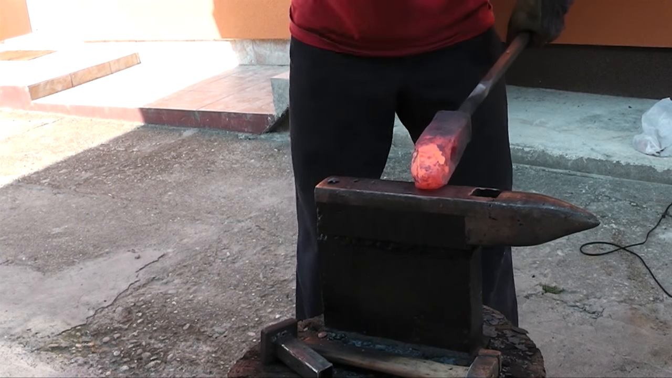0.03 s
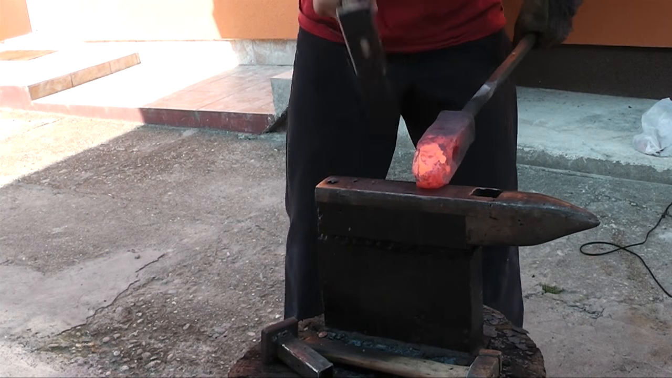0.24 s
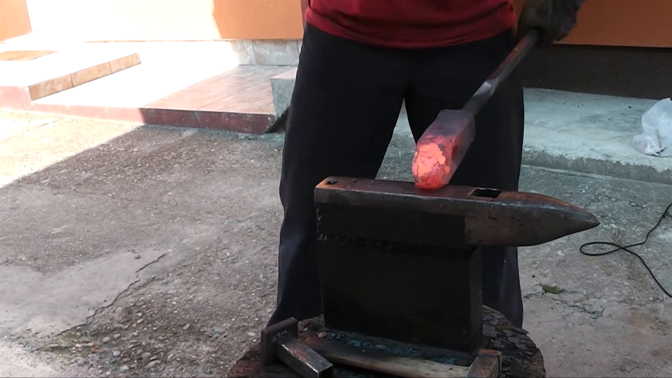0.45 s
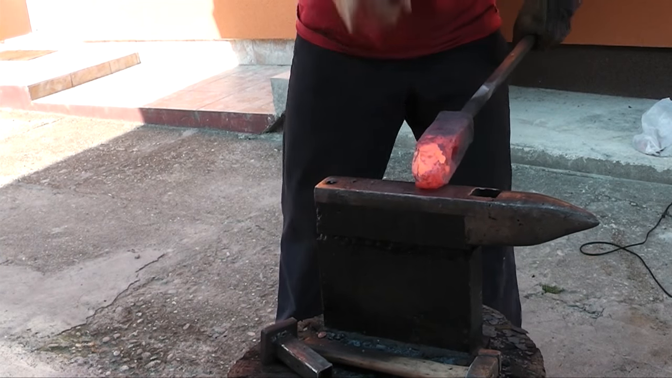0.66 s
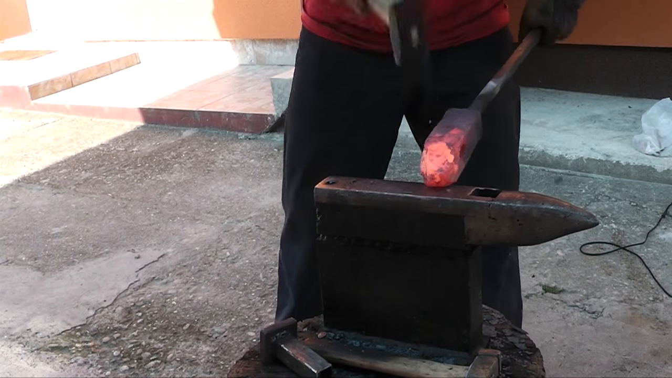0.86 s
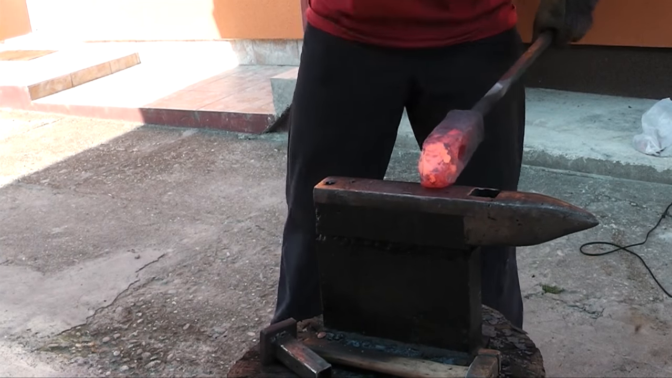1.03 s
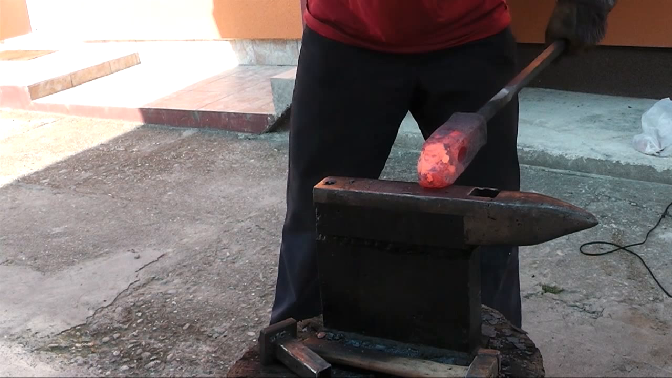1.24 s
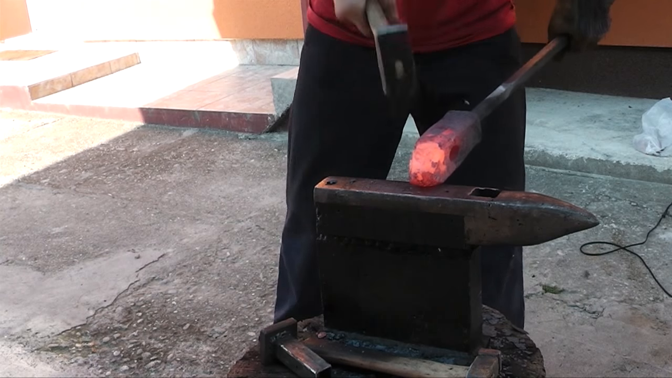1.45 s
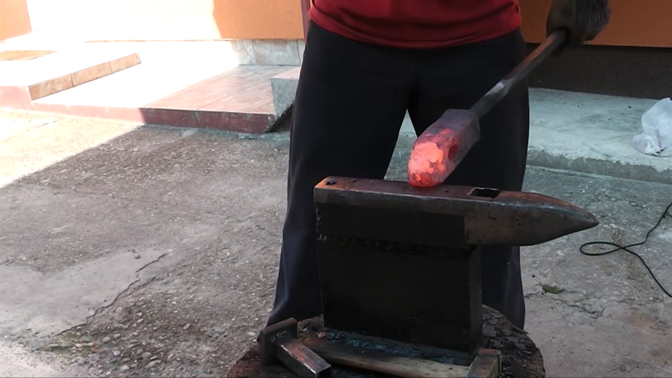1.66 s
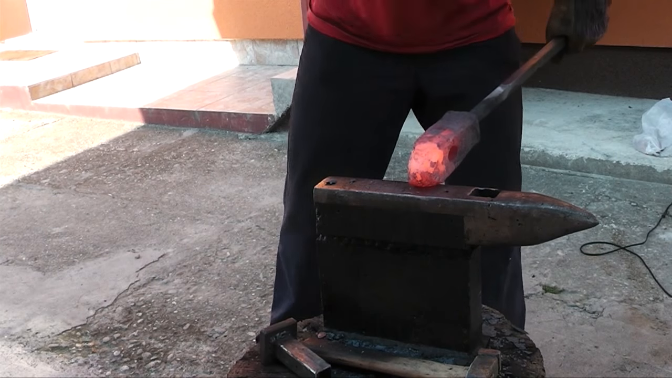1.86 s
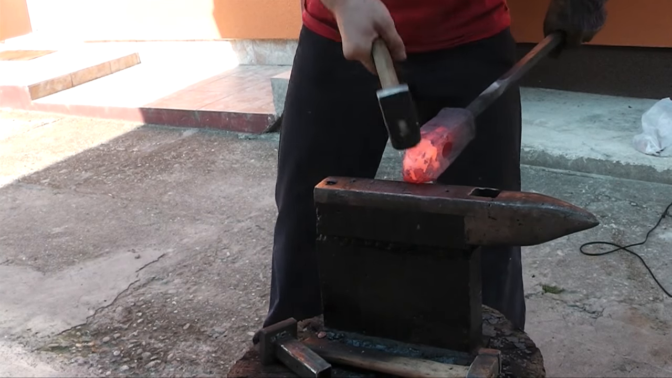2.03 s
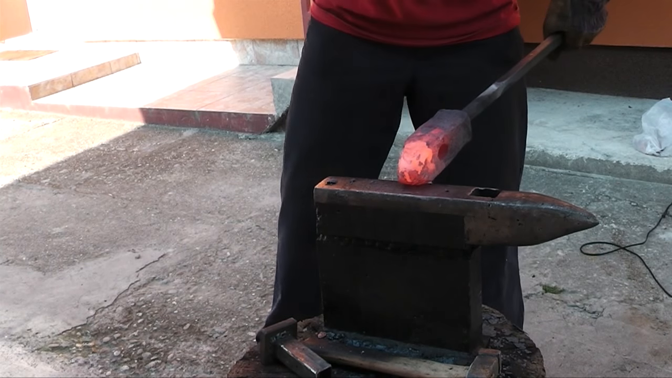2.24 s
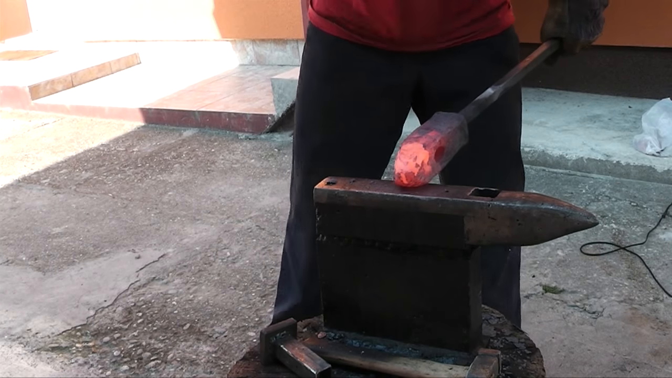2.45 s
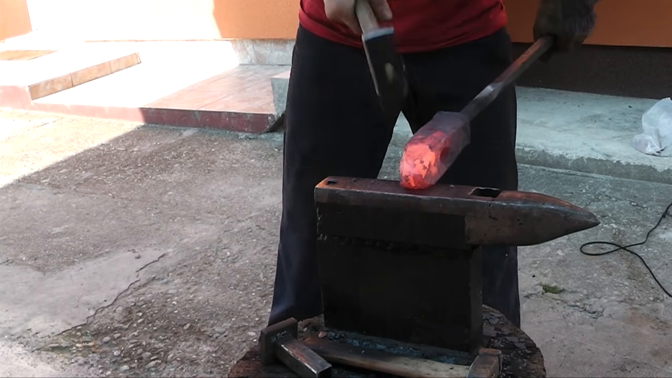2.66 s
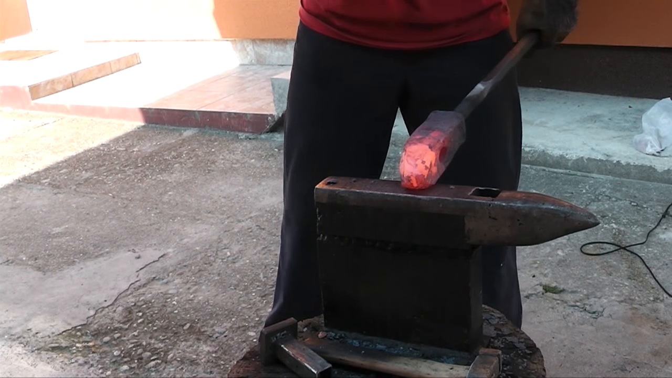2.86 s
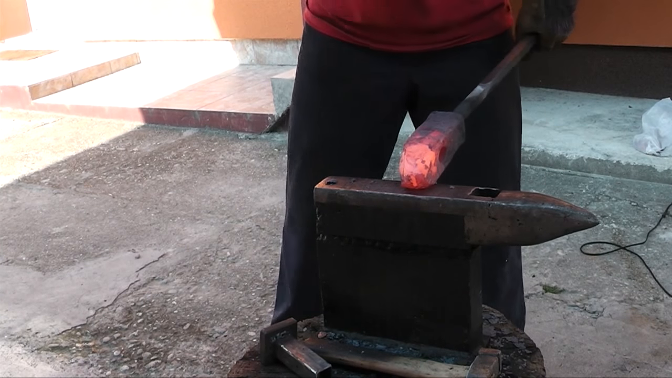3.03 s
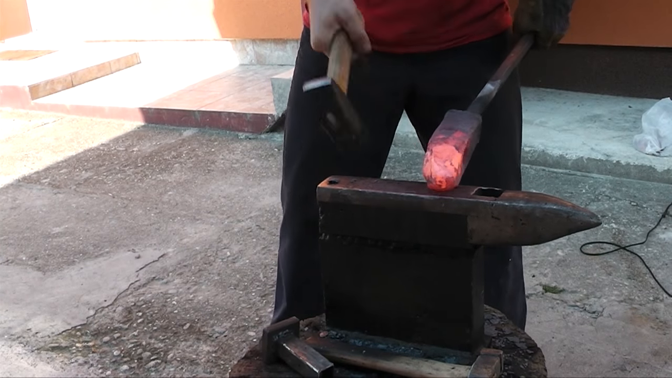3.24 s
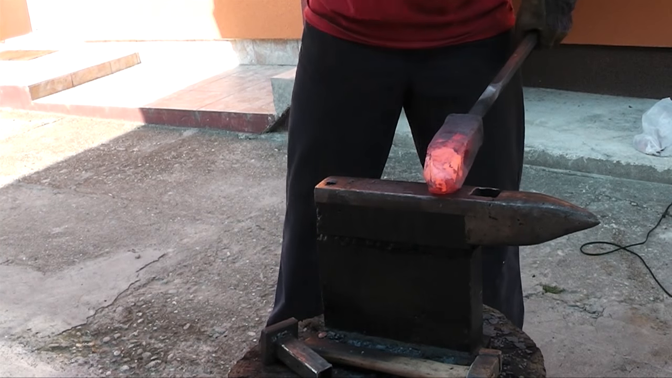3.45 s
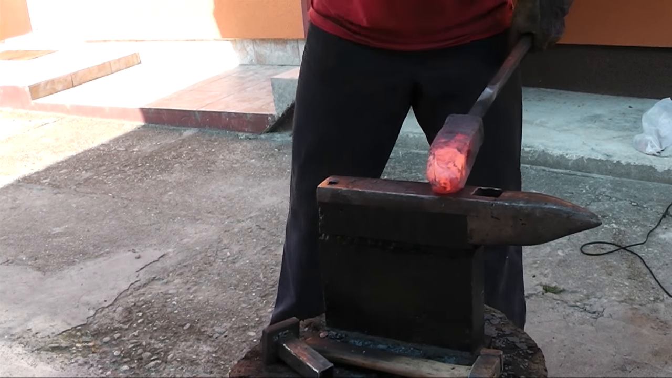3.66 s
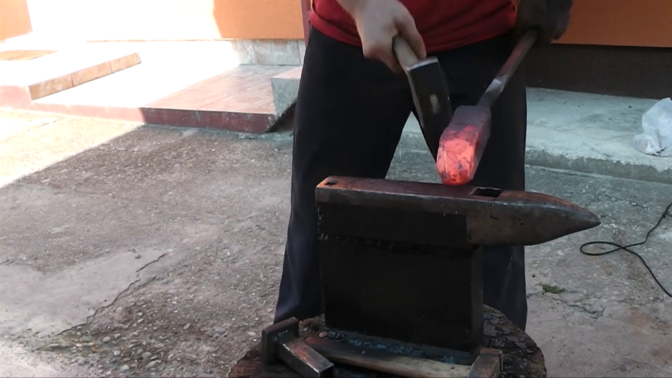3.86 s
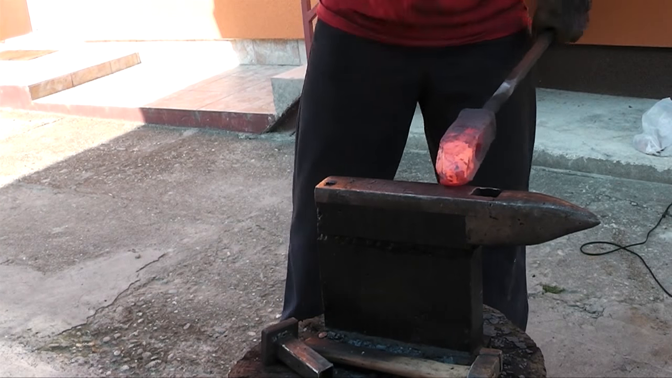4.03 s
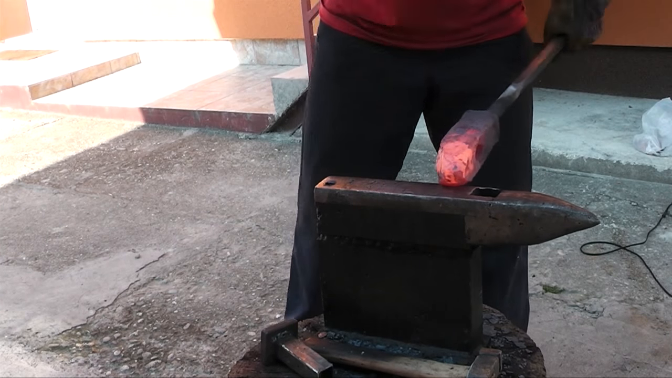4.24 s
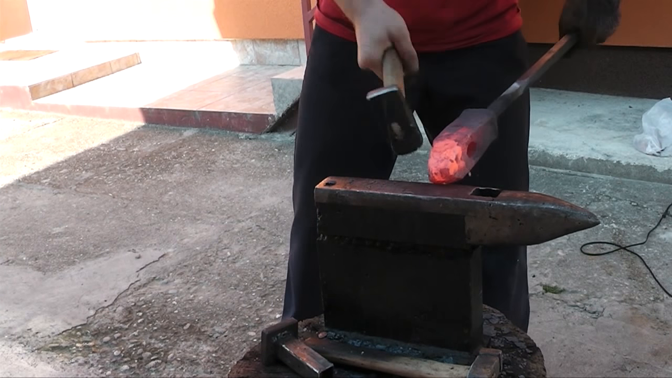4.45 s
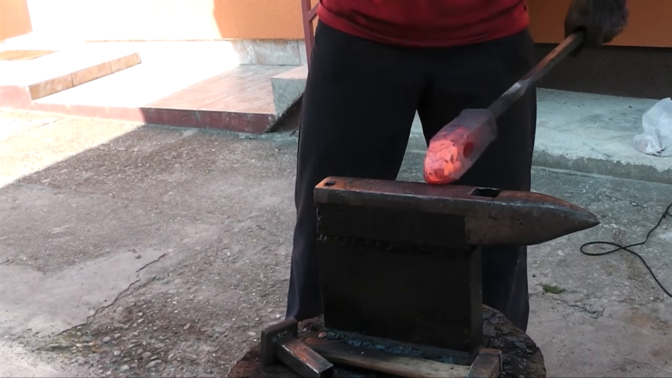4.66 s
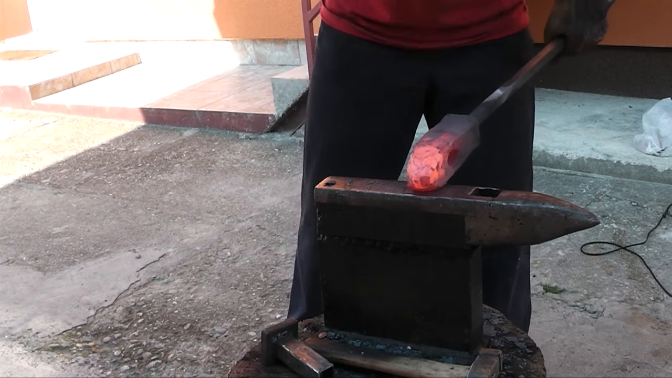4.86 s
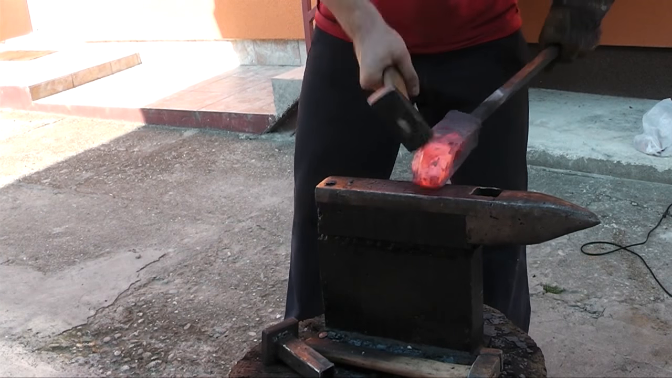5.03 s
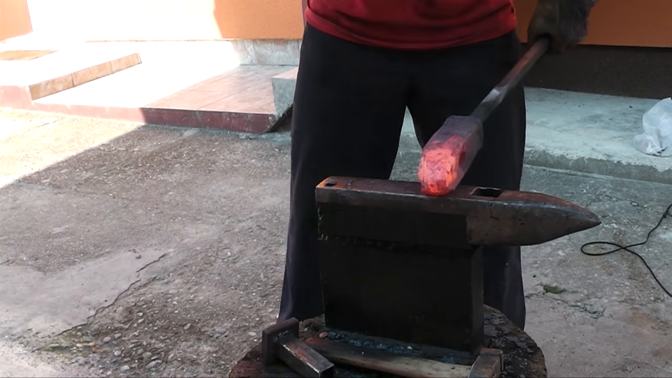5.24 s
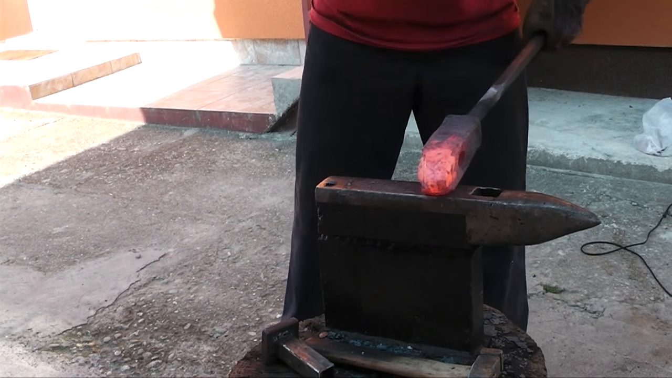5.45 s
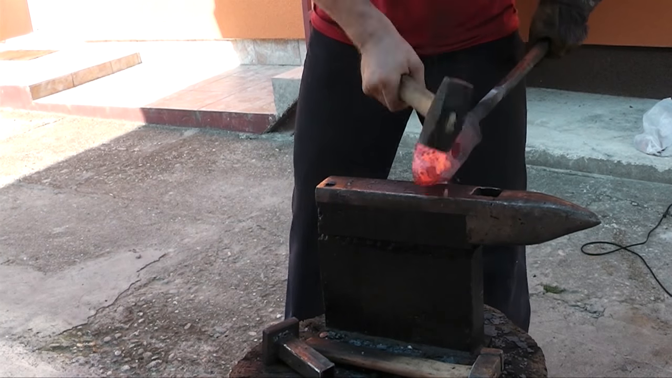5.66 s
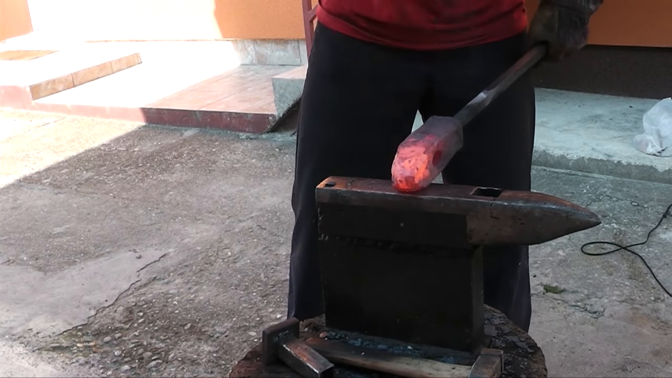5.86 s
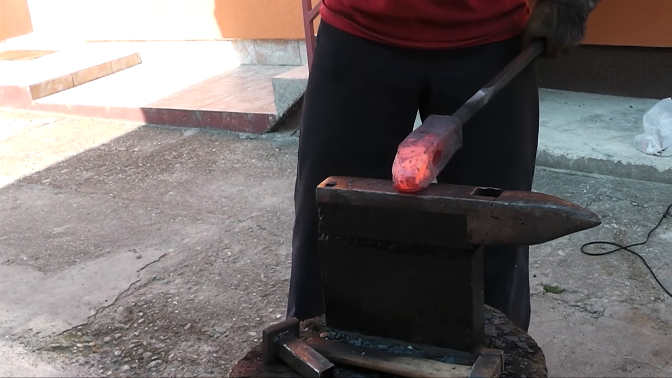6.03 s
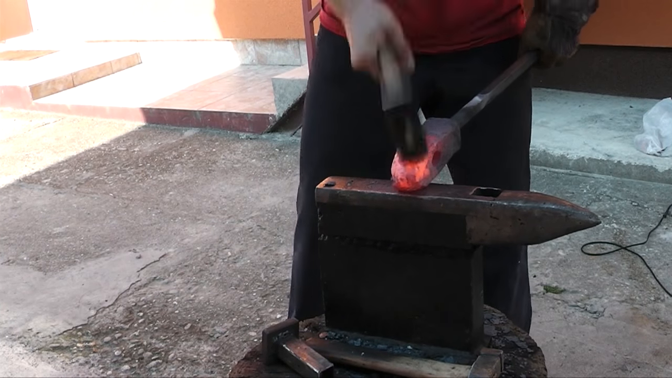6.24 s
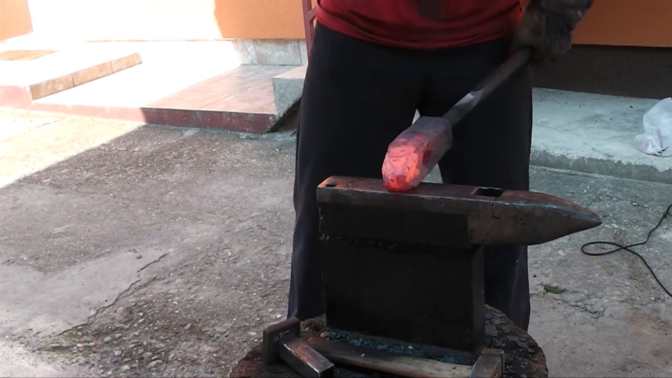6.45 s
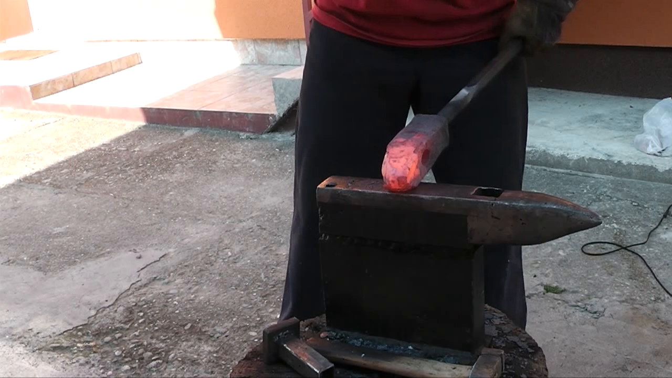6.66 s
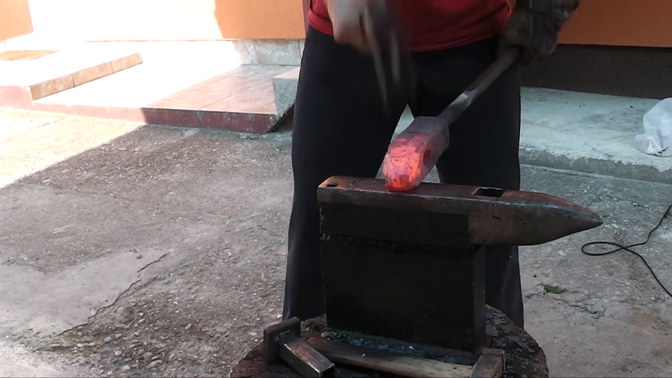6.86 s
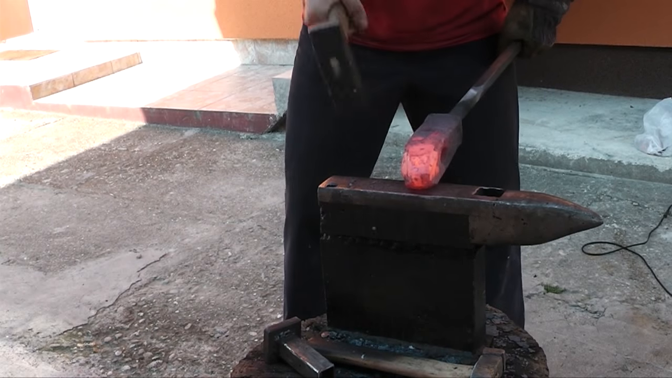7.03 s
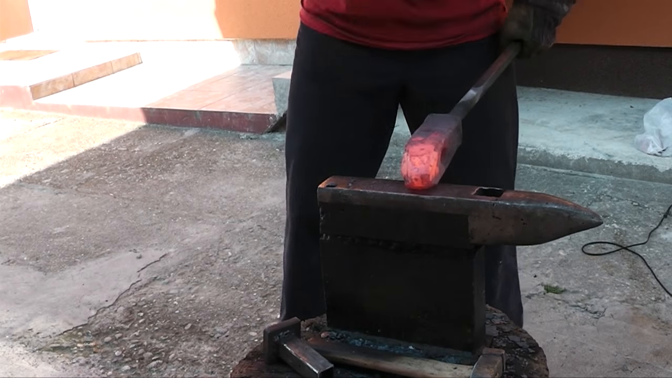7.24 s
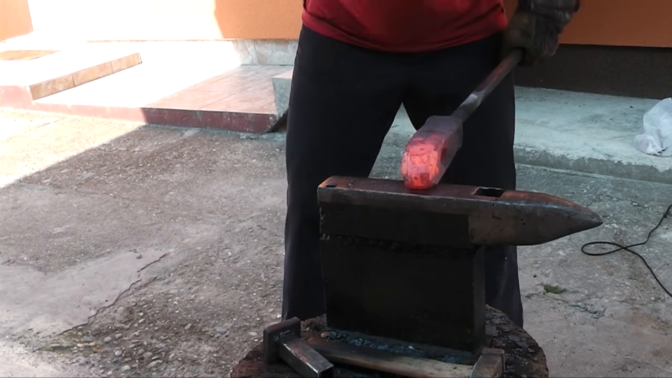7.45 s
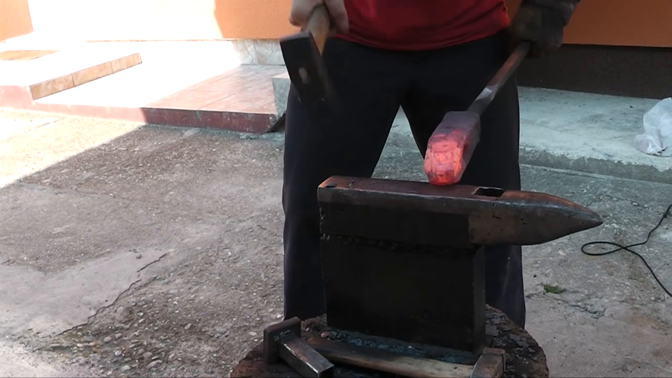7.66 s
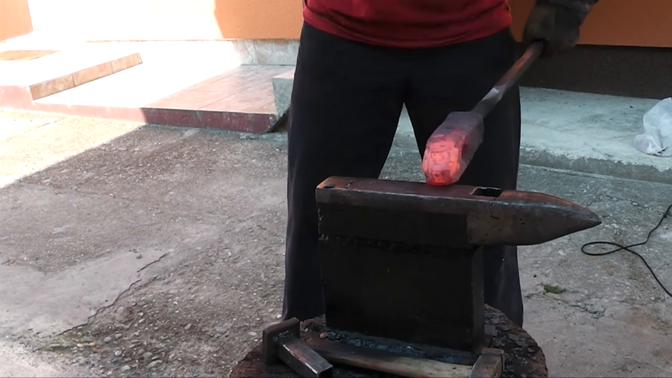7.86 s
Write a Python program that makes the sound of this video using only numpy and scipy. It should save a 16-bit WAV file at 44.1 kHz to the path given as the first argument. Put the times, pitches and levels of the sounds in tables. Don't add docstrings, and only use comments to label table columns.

```python
import sys
import numpy as np
from scipy import signal
from scipy.fft import rfft, irfft
from scipy.io import wavfile
from scipy.ndimage import uniform_filter1d

SR = 44100
rng = np.random.default_rng(int(sys.argv[2]) if len(sys.argv) > 2 else 0)


def bounce(signal):
    frames = np.transpose(np.atleast_2d(signal))
    limited = np.clip(frames, -1, 1)
    pcm = np.round(limited * 32767).astype(np.int16)
    wavfile.write(sys.argv[1], SR, pcm)


def attenuation_scalar(level_db):
    decades = np.asarray(level_db, float) / 20
    return 10 ** decades


N = 348390

USUAL_THUD_DB = -6
SETTLE_DB, SETTLE_S = 3.5, 0.062

# start in seconds, thud in dB, landing off the middle of the face as dB lost by the
# main ring, tilt onto the hammer's edge in dB, recorder gain after the dive in dB.
BLOWS = [(0.1804, -5.5, -1.5, 3, -19.5), (0.7749, -9.5, -5.5, 2.5, -23.5), (1.3839, -5.5, -13.5, -15, -17),
         (1.998, -8, -4.5, -23, -18.5), (2.6082, -8, 1, -4.5, -19.5), (3.229, -6, -1, 0.5, -20.5),
         (3.85, -10.5, -5, 1, -24), (4.4629, -8, -21.5, -5.5, -18), (5.0893, -8.5, -1.5, -2, -22.5),
         (5.718, -10.5, -6.5, 1.5, -23), (6.35, -5.5, 0.5, 4, -19.5), (6.9594, -5, 1.5, 7, -20.5),
         (7.5907, -8, 0.5, 4.5, -22)]


def blows():
    s, thud, _, tilt, gain = np.transpose(BLOWS)
    lift = -gain - SETTLE_DB
    rattle = 1.5 + 0.59 * (thud - USUAL_THUD_DB) + lift
    knock = impact(s, thud, tilt, lift)
    metal = anvil(s, lift) + hammer(s, lift) + ground(s, lift)
    metal = metal + tools(s, rattle - 50) + scale(s, rattle)
    return knock, metal


# frequency in Hz, level in dB, t60 in seconds.
STUMP_MODES = [(287, -34, 0.062), (380, -26, 0.21), (463, -11.5, 0.25), (467.5, -2, 0.046), (500, 0, 0.065),
               (525, -11.5, 0.2), (516, -33, 0.34), (731, -44, 0.035), (935, -14, 0.16), (145, -49, 0.021),
               (50, -8.5, 0.021)]
# frequency in Hz, level in dB per Hz.
CRACK_SPECTRUM = [(60, -30), (300, -14), (700, -3), (1820, 0), (2230, -11.5), (2730, -7.5), (3340, -29),
                  (4810, -5.5), (7080, -26.5), (10600, -22), (12700, -51), (22000, -120)]
# frequency in Hz, level in dB per Hz.
TICK_SPECTRUM = [(1000, -46), (5000, -10), (8500, -2), (11000, -8), (13000, -11), (22000, -100)]


def impact(s, thud, tilt, lift):
    crack = -18 - 0.2 * tilt
    stump = -ring(s + 0.0013, thud + lift - 5, STUMP_MODES, scatter_db=1.55, soft_s=0.00011)
    faces = burst(s, crack + lift + 9, 0.028, CRACK_SPECTRUM)
    edge = burst(s, shares(HAMMER_SHARE)[-1] + lift + 40, 0.02, TICK_SPECTRUM)
    return stump + faces + edge


ANVIL_HZ = [
    [1371, 1420],
    [1700, 2040, 828, 743],
    [2589, 2666, 3300],
    [4246],
    [5320, 5143],
]
# one family of pairs, level in dB and t60 in seconds.
ANVIL_RINGS = [
    [(3, 1.8), (-34, .3)],
    [(8.5, 0.39), (-2, 0.2), (7.5, 0.19), (-4.5, 1)],
    [(8, 0.92), (-7, 0.72), (-17.5, 0.74)],
    [(-7, 0.93)],
    [(0, 0.36), (0, 0.28)],
]
# usual level in dB, then dB per dB of thud,
# per dB of off-middle loss, per dB of tilt.
ANVIL_SHARE = [(-25.5, 0.57, 0.93, 0.013), (-37, 1.3, -.05, 0.14), (-37.5, 0.34, -0.12, 0.14),
               (-56.5, -1.2, -0.98, .05), (-60.5, -4.4, -0.84, .5)]
# delay for the main ring in seconds, its decay in dB per
# second, delay for the other rings in seconds, their decay in dB per second.
RESTS = [(.13, 156, 0.14, 230), (0.19, 168, 0.22, 284), (0.12, 130, 0.19, 320), (.11, 210, 0.12, 121),
         (.11, 300, .13, 148), (0.13, 85, 0.098, 170), (0.074, 150, 0.13, 151), (.13, 132, 0.13, 137),
         (0.094, 132, 0.12, 141), (0.12, 130, .11, 132), (0.11, 121, 0.19, 126), (.12, 155, 0.084, 347),
         (0.13, 182, .16, 260)]


def anvil(s, lift):
    k, since = since_blow()
    rests = np.transpose(RESTS)
    lying = np.maximum(since - rests[::2, k], 0)
    choke = attenuation_scalar(-rests[1::2, k] * lying * (1 + lying / 0.5))
    main_ring, *other_rings = families(s, lift + 4, ANVIL_SHARE, ANVIL_HZ, ANVIL_RINGS)
    return choke[0] * main_ring + choke[1] * sum(other_rings)


HAMMER_HZ = [
    [4775, 4830, 4969],
    [5901, 4810, 6350],
    [6395, 6300, 7014],
    [7450, 7560],
    [8489, 8800, 9810, 10400],
]
# one family of pairs, level in dB and t60 in seconds.
HAMMER_RINGS = [
    [(8.5, 0.52), (-6, 0.07), (-9, 0.3)],
    [(6, 0.54), (21.6, 0.094), (15.1, 0.1)],
    [(7.5, 0.2), (6, 0.086), (-12, 0.25)],
    [(4, 0.21), (3, 0.072)],
    [(4.6, 0.27), (3.2, 0.11), (2, 0.13), (10, 0.33)],
]
# usual level in dB, then dB per dB of thud,
# per dB of off-middle loss, per dB of tilt.
HAMMER_SHARE = [(-51, -0.24, -0.16, -0.041), (-51.5, 0.9, 0.11, 0.11), (-43.5, -.2, .05, 0.32),
                (-49, -0.1, .05, 1.9), (-58.5, -0.44, 0.17, 0.92)]


def hammer(s, lift):
    return sum(families(s, lift + 5, HAMMER_SHARE, HAMMER_HZ, HAMMER_RINGS))


# frequency in Hz, level in dB per Hz.
RUMBLE_SPECTRUM = [(20, 1), (50, -2), (110, 2.5), (170, -7.5), (300, -36), (22000, -120)]


def ground(s, lift):
    return burst(s, lift - 44.5, 0.76, RUMBLE_SPECTRUM)


def tools(s, db):
    place, life = rng.random((2, 22))
    modes = np.transpose([4000 * 2.3 ** place, -12 * place, 0.08 + 0.2 * life])
    return ring(s, db, modes, scatter_db=5.0, soft_s=0.00001)


# frequency in Hz, level in dB per Hz.
CLATTER_SPECTRUM = [(35, -83), (60, -25), (483, -0.5), (1130, -8), (1380, -5), (2120, -25), (2590, -10.5),
                    (2900, -30), (4860, -14), (10600, -29.5), (12700, -41), (16600, -86), (22000, -120)]


def scale(s, rattle):
    return burst(s, rattle - 20, 0.065, CLATTER_SPECTRUM) + burst(s, rattle - 28, 0.65, CLATTER_SPECTRUM)


# start in seconds, thud in dB, bar ring in dB, steel on steel in dB.
BOUNCES = [(0.267, -41, -35, -30), (0.868, -44, -47, -35), (0.903, -31, -41, -41.5),
           (1.491, -14, -34.5, -25.5), (1.526, -37, -41.5, -36.5), (2.07, -45, -34.5, -34),
           (3.327, -49, -40, -35), (3.397, -30, -39.5, -46), (3.957, -39, -42, -35.5),
           (5.158, -22.5, -46, -47), (5.796, -48, -41, -36), (6.429, -34, -35, -35), (6.501, -60, -41, -57),
           (7.073, -47, -33.5, -33.5), (7.698, -18.5, -42, -30.5)]
# frequency in Hz, level in dB, t60 in seconds.
TOUCH_MODES = [(1700, 0, .3), (1371, -10, .3), (4246, -15, .4), (5143, -13, .35), (5320, -14, .35),
               (5901, -15, .35), (4775, -16, .3)]
# frequency in Hz, level in dB, t60 in seconds.
BAR_MODES = [(545, 5, 0.32), (574.3, 13.5, 0.21), (484, 3.5, 0.14), (616, 3, 0.54), (699, 4.5, 0.22)]


def bounces():
    s, *levels = np.transpose(BOUNCES)
    thud, hum, steel = np.array(levels) - gain_db()[(s * SR).astype(int)]
    knock = ring(s, thud - 8, STUMP_MODES[1:-2], scatter_db=2.0, soft_s=0.0004)
    knock = knock + burst(s, steel + 3, 0.03, CRACK_SPECTRUM)
    knock = knock + burst(s, steel - 12, 0.036, TICK_SPECTRUM)
    metal = ring(s, steel, TOUCH_MODES, scatter_db=2.0, soft_s=0.00003)
    metal = metal + ring(s, hum, BAR_MODES, scatter_db=2.0, soft_s=0.0004)
    return signal.sosfilt(signal.butter(3, 330, "high", fs=SR, output="sos"), [knock, metal])


# delay in seconds, level in dB.
WALLS = [(0.015, -13.5), (.042, -20.5), (.052, -23), (.066, -18.5), (0.082, -27)]


def echoes(knocks):
    late, wall_db = np.transpose(WALLS)
    back = signal.oaconvolve(knocks, taps(late, wall_db)[:SR // 4])[:N]
    return signal.sosfilt(signal.butter(2, 3500, fs=SR, output="sos"), back)


# frequency in Hz, level in dB.
SPREAD = [(30, -4), (300, -6), (1500, -27), (4000, -0.5), (10500, -11), (12500, 12)]


def yard(hits):
    n = SR // 10
    scatter = rng.standard_normal(n) * np.exp(-np.arange(n) / (0.1 * SR))
    diffuse = signal.oaconvolve(hits, scatter / np.linalg.norm(scatter))
    return attenuation_scalar(-24.5 + 4.0) * colour(diffuse, SPREAD)


# frequency in Hz, level in dB per Hz.
AIR_SPECTRUM = [(25, -24.5), (180, -21.5), (300, -12), (600, -10), (960, -8), (1200, -12), (1900, -16),
                (2500, -31), (3300, -34.5), (4500, -28.5), (7500, -31.5), (10800, -30.5), (11800, -35),
                (12700, -101)]
# frequency in Hz, level in dB, width in Hz.
WHINE = [(1025, -32.5, 4), (2050, -50, 25), (1470, -46, 30), (960, -43, 20)]


def blower():
    flutter = attenuation_scalar(0.93 * walk(120) + 0.23 * walk(8.2))
    air = level(colour(rng.standard_normal(N) * flutter, AIR_SPECTRUM), -30)
    for hz, db, width in WHINE:
        sway = walk(width) + 1j * walk(width) + 0.6 * walk(60) + 4.5
        tone = sway * np.exp(2j * np.pi * hz * np.arange(N) / SR)
        air = air + level(tone.real, db)
    return air


def since_blow():
    s, t = np.transpose(BLOWS)[0], np.arange(N) / SR
    k = np.searchsorted(s, t) - 1
    return k, np.where(k < 0, t, t - s[k])


def shares(law):
    _, thud, off, tilt, _ = np.transpose(BLOWS)
    return np.array(law) @ np.array([np.ones(len(thud)), thud - USUAL_THUD_DB, off, tilt])


def families(s, lift_db, law, hz, rings):
    out = []
    for db, family_hz, family_rings in zip(shares(law), hz, rings):
        modes = np.column_stack([family_hz, family_rings])
        out.append(ring(s, db + lift_db, modes, scatter_db=0.7, soft_s=0.00001))
    return np.array(out)


def ring(s, db, modes, scatter_db, soft_s):
    out, chance = 0, rng.standard_normal((len(s), len(modes)))
    for (hz, mode_db, t60), luck in zip(modes, chance.T):
        r, w = np.exp(-np.log(1000) / (t60 * SR)), 2 * np.pi * hz / SR
        force = taps(s, db + mode_db + scatter_db * luck)
        out = out + signal.lfilter([0, np.sin(w)], [1, -2 * r * np.cos(w), r * r], force)
    k = np.exp(-1 / (soft_s * SR))
    return signal.lfilter([1 - k], [1, -k], out)


def burst(s, db, t60, spectrum):
    fall = signal.lfilter([1], [1, -np.exp(-np.log(1000) / (t60 * SR))], taps(s, db))
    fall = uniform_filter1d(fall, size=25, origin=12)
    white = rng.standard_normal(N)
    return colour(white * fall, spectrum) / np.std(colour(white, spectrum))


def taps(s, db):
    x = np.zeros(N)
    np.add.at(x, np.round(np.asarray(s) * SR).astype(int), attenuation_scalar(db))
    return x


def colour(x, spectrum):
    hz, db = np.transpose(spectrum)
    grid = np.log(np.linspace(1, SR / 2, 2049))
    cep = irfft(np.interp(grid, np.log(hz), db) * np.log(10) / 20)
    cep[1:2048] *= 2
    cep[2049:] = 0
    return signal.oaconvolve(x, irfft(np.exp(rfft(cep))))[:N]


def walk(rate):
    k = int(SR / rate)
    held = np.repeat(rng.standard_normal(N // k + 1), k)
    return 0.97 * uniform_filter1d(uniform_filter1d(held, k), k)[:N]


def level(x, db):
    return x * attenuation_scalar(db) / np.sqrt(np.mean(x ** 2))


# frequency in Hz, left minus right in dB.
LEAN = [(60, 2), (110, 4), (200, 3), (350, 3), (640, 2.5), (1150, 2.0), (2080, 1), (3770, 0.5),
        (6800, -1.5), (12300, -2.5)]


def scene():
    (knock, metal), (tap, hum) = blows(), bounces()
    hits = knock + tap + metal + hum + echoes(knock + tap)
    mid, side = hits + blower(), yard(hits)
    hz, lean_db = np.transpose(LEAN)
    ports = [colour(mid + sign * side, np.transpose([hz, sign * lean_db / 2])) for sign in (1, -1)]
    return np.array(ports)


def gain_db():
    climb_db_s, hold_s, first_db = 47, 0.23, -8.5
    low_db = np.transpose(BLOWS)[-1]
    k, since = since_blow()
    settling = SETTLE_DB * np.exp(-(since / SETTLE_S) ** 2)
    after = low_db[k] + settling + climb_db_s * np.maximum(since - hold_s, 0)
    return uniform_filter1d(np.where(k < 0, first_db + climb_db_s * since, after), size=88)


# frequency in Hz, level in dB.
MASK = [(1800, -32.5), (3000, -28.5), (3600, -19), (4500, -27.5), (7800, -19.5), (8200, -14), (8700, -23.5),
        (9500, -16), (11500, -55), (12000, -10), (22050, -24)]


def thin_out(x):
    hz, _, cells = signal.stft([x[0] + x[1], x[0] - x[1]], SR, nperseg=1024)
    power = np.abs(cells) ** 2
    mask = np.interp(hz, *np.transpose(MASK))
    side_mask = np.where(hz > 11900, -37, mask + 8 * (hz < 10000))
    loud = np.log(np.mean(power[0], axis=0))
    bar = np.exp(0.68 * loud + 0.3 * np.mean(loud)) * attenuation_scalar(2 * np.array([mask, side_mask]))[:, :, None]
    share = np.interp(hz, [2500, 2800, 3600, 4000, 7000, 8200, 9000], [.1, .65, .65, .2, .25, .4, .3])[:, None]
    bar = np.maximum(bar, share * uniform_filter1d(np.minimum(power, 30 * bar), size=21, axis=1))
    smooth = uniform_filter1d(uniform_filter1d(power, size=2, axis=1), size=3, axis=2)
    keep = (smooth > bar) | (hz[:, None] < 1800)
    mid, side = signal.istft(cells * keep, SR, nperseg=1024)[1][:, :N] / 2
    return np.array([mid + side, mid - side])


def band_limit(x):
    return signal.sosfilt(signal.butter(12, 12890, fs=SR, output="sos"), x)


def record(dry):
    hiss = rng.standard_normal(dry.shape)
    hiss = signal.sosfilt(signal.butter(2, [8000, 11500], "band", fs=SR, output="sos"), hiss)
    hiss = signal.sosfilt(signal.ellip(8, 0.5, 60, 11900, fs=SR, output="sos"), hiss)
    x = (dry + level(hiss, -56)) * attenuation_scalar(gain_db())
    x = np.tanh(0.97 * x) / 1.28
    x = signal.sosfilt(signal.butter(9, 11950, fs=SR, output="sos"), x)
    x = signal.sosfilt(signal.butter(1, 15, "high", fs=SR, output="sos"), thin_out(x))
    return band_limit(x)


dry = scene()
out = record(dry)
bounce(out)
```